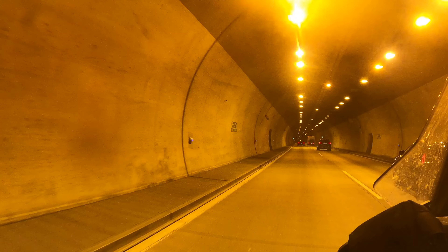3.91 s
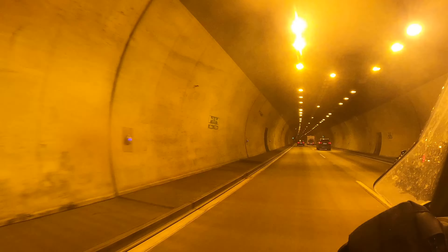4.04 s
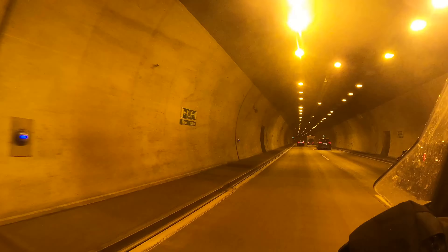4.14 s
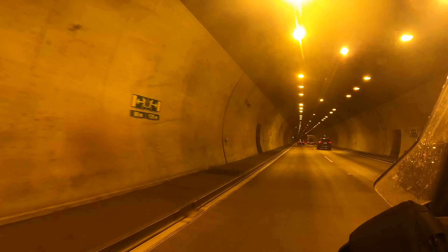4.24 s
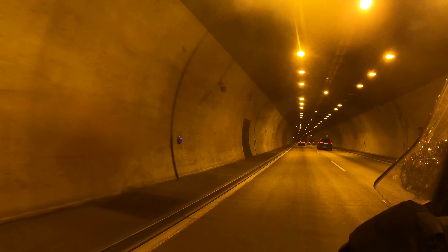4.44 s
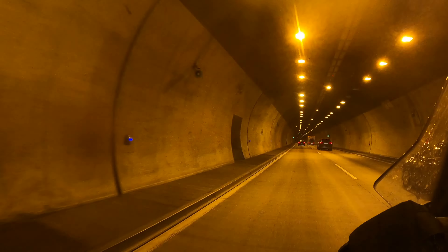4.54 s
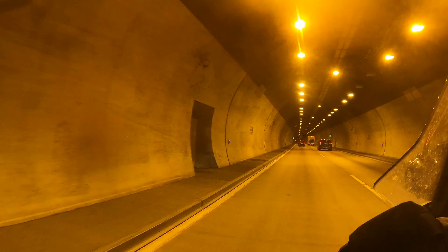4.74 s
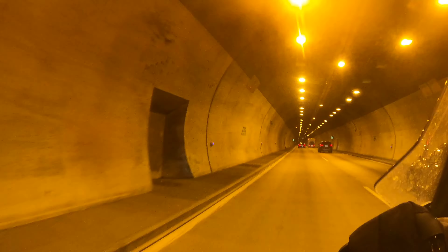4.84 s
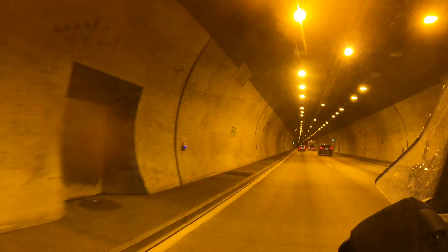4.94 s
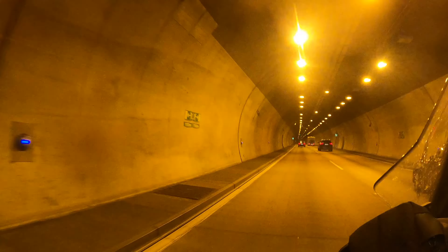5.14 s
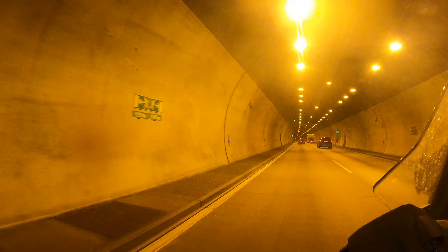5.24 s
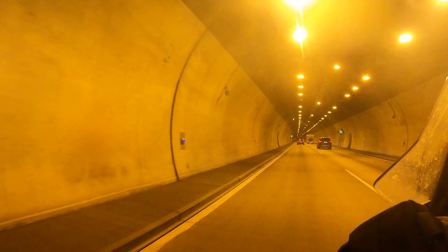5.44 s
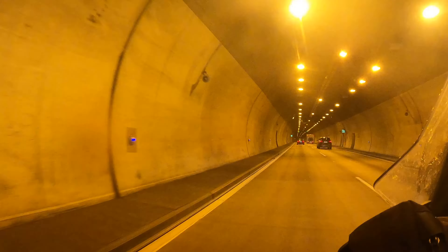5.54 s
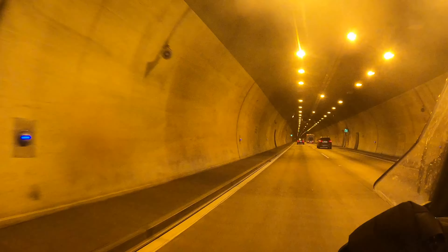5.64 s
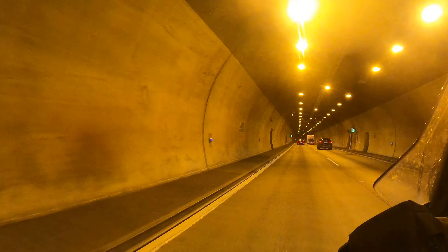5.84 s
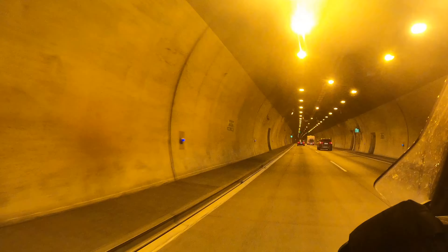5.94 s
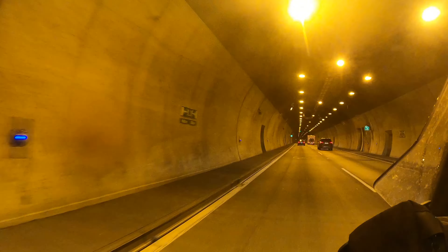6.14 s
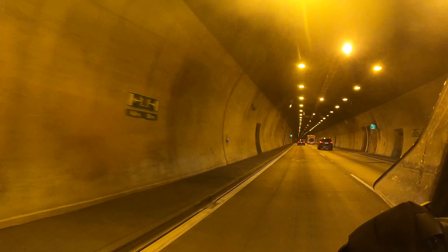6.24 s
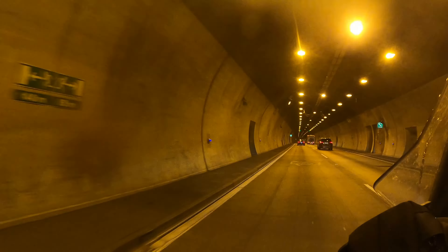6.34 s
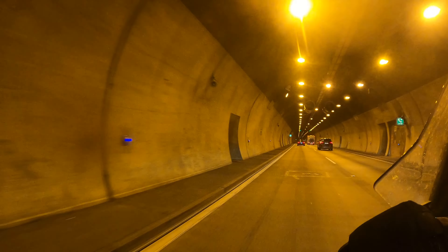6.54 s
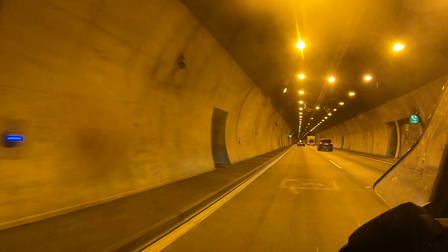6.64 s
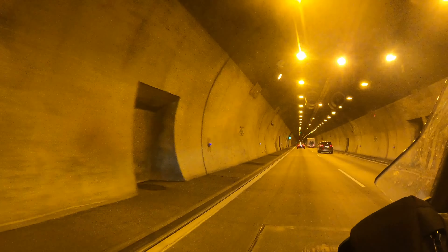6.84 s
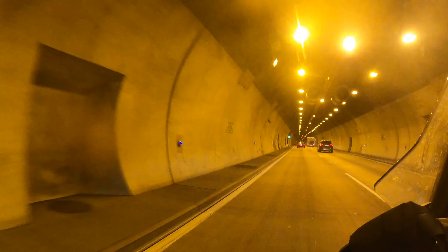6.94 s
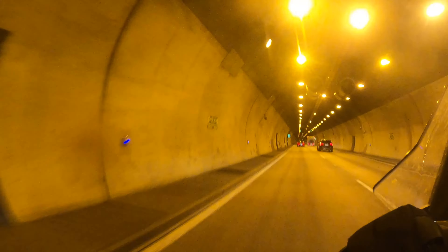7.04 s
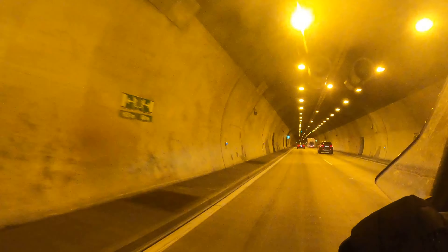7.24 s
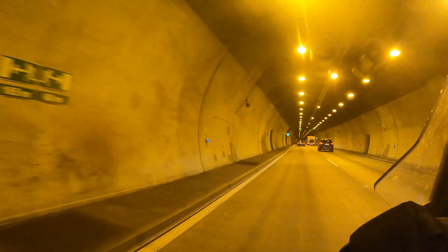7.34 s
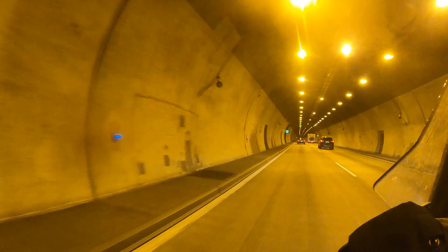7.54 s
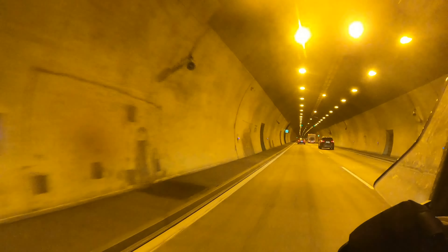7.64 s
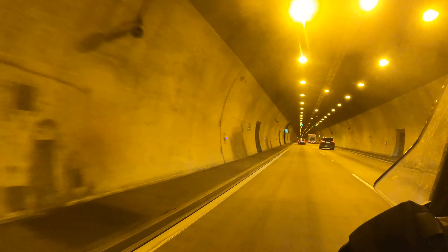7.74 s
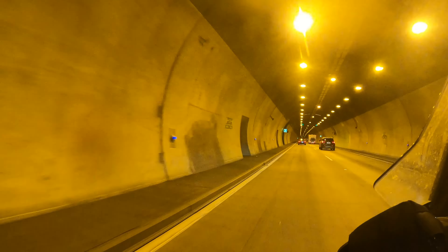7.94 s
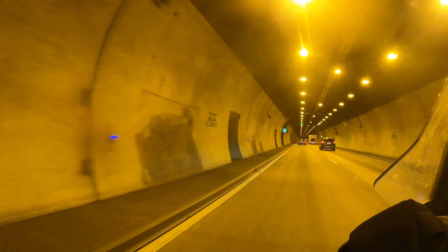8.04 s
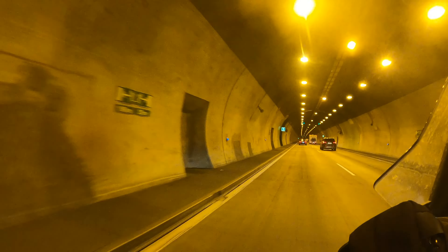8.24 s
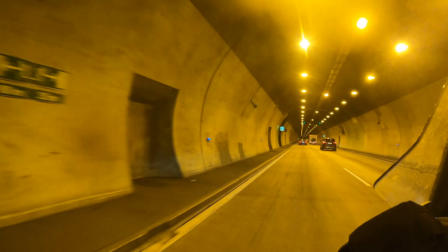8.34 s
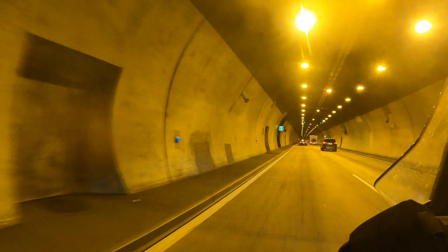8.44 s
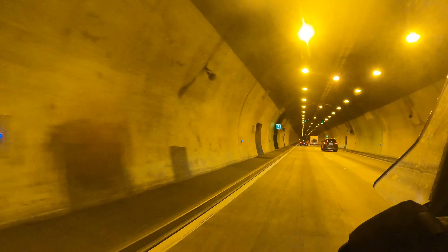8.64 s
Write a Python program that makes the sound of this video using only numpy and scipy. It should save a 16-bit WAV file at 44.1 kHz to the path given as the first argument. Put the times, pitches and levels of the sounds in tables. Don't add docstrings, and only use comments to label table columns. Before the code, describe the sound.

A motorcycle cruises through a concrete tunnel, heard from a housing near the engine. Deep, fluttering exhaust throb holds nearly one pitch while throttle nudges bring rough growls. Wind thumps the microphone throughout, tyre roar builds over the first second and stays dense, air hiss softens, and a second engine blurs in by wall echoes.

```python
import sys
import numpy as np
from scipy import signal
from scipy.fft import rfft, irfft, next_fast_len
from scipy.io import wavfile
from scipy.ndimage import uniform_filter1d, minimum_filter1d

SR = 44100
rng = np.random.default_rng(int(sys.argv[2]) if len(sys.argv) > 2 else 0)


def materialize(psi):
    bounded = np.clip(np.atleast_2d(psi).T, -1, 1)
    quanta = np.round(bounded * 32767).astype(np.int16)
    wavfile.write(sys.argv[1], SR, quanta)


def to_linear_factor(level_db):
    exponent = np.asarray(level_db, float) / 20
    return 10 ** exponent


N = 383669

# (time [s], half length [s], bark level [dB])
THROTTLE_BLIPS = [(0.0, 0.055, -22), (1.3, .12, -25.5), (1.7, .09, -26.5), (2.2, .09, -26),
                  (2.45, .1, -25.5), (2.7, 0.097, -17.5), (3.0, .08, -17), (3.18, .08, -24.5),
                  (5.0, 0.14, -17), (5.3, 0.13, -24), (5.95, .15, -26.5), (6.25, 0.067, -24.5),
                  (6.85, 0.07, -16.5), (7.17, 0.1, -17.5)]
# (time [s], edge level [dB], hiss level [dB])
EDGE_AND_HISS = [(0, -81, -100), (.6, -80, -97.5), (1.2, -71, -92), (2.9, -66, -90.5), (3.3, -66.5, -77.5),
                 (8.7, -67, -77)]


def level(x, db):
    return x * to_linear_factor(db) / np.sqrt(np.mean(x ** 2))


def curves(table):
    s, *columns = np.transpose(table)
    return [np.interp(np.arange(N) / SR, s, c) for c in columns]


def smooth(x, seconds):
    k = int(seconds * SR)
    for _ in range(3):
        x = uniform_filter1d(x, k)
    return x


def walk(rate):
    k = int(SR / rate)
    held = np.repeat(rng.standard_normal(N // k + 1), k)
    return 1.236 * uniform_filter1d(uniform_filter1d(held, k), k)[:N]


def bells(rows):
    t = np.arange(0, N + 100, 100) / SR
    power = sum(to_linear_factor(db) ** 2 * np.exp(-2 * ((t - s) / half) ** 2) for s, half, db in rows)
    return np.interp(np.arange(N) / SR, t, power)


def patchy_noise(shape, shared_db, own_db, own_rate, tilt_db=0):
    size = next_fast_len(N)
    hz = np.maximum(np.arange(size // 2 + 1) * SR / size, 1)
    edges, dbs = np.transpose(shape)
    colour_db = np.interp(np.log(hz), np.log(edges), dbs, -120, -120)
    colour = rfft(rng.standard_normal(size)) * to_linear_factor(colour_db)
    out = 0
    for centre in np.arange(np.log2(edges[0]), np.log2(edges[-1]) + .5, .5):
        share = np.clip(1 - 2 * abs(np.log2(hz) - centre), 0, 1)
        band = irfft(colour * share, size)[:N]
        flicker_db = own_db * walk(own_rate)
        out = out + band * to_linear_factor(flicker_db + tilt_db * (centre - np.log2(1000)))
    return level(out * to_linear_factor(shared_db), 0)


def order(turns, k, wander, scatter, rate):
    echo = scatter * (walk(rate) + 1j * walk(rate))
    wave = (1 + echo) * np.exp(1j * (2 * np.pi * k * turns + wander * walk(1.5)))
    return np.sqrt(2 / (1 + 2 * scatter ** 2)) * wave.real


def buffeting():
    # (frequency [Hz], density [dB per Hz])
    buffet_band = [(15, -4), (30, -1), (80, 2), (150, -0.5), (300, -6), (450, -12), (700, -26), (1100, -46)]
    t = np.arange(N) / SR
    gust_db = 5.5 * np.exp(-(t / .36) ** 4)
    growth_db = 2.5 * np.tanh(t / 1.5)
    buffet_db = -19 + gust_db + growth_db + 0.65 * walk(5.8)
    lull_db = -1.4 * np.exp(-((t - 1.17) / 0.4) ** 2)
    swing_db = 0.37 * walk(9.7) + 3.2 * lull_db
    return to_linear_factor(buffet_db) * patchy_noise(buffet_band, swing_db, own_db=-0.7, own_rate=8.2, tilt_db=lull_db)


def tyre_roar(roar_db, gust_db, opened, flutter):
    # (frequency [Hz], density [dB per Hz])
    roar_band = [(200, -18.5), (400, -5.5), (620, -2.5), (780, -0.5), (900, 0), (1020, -2), (1250, -4.5),
                 (1700, -8), (2400, -17.5), (3500, -25.5), (5000, -43.5)]
    t = np.arange(N) / SR
    bright_start_db = 1.5 * np.exp(-(t / 1.1) ** 2)
    tilt_db = -0.43 + bright_start_db - 1 * opened + gust_db + 0.23 * walk(8)
    roar = patchy_noise(roar_band, .5 * flutter, own_db=0.0, own_rate=11.0, tilt_db=1.8 * tilt_db)
    return to_linear_factor(roar_db + 1.2) * roar


def tread_ring(roar_db):
    # (frequency [Hz], density [dB per Hz])
    tread_band = [(780, -13.5), (860, -2), (930, 0), (1020, -3), (1120, -13)]
    t = np.arange(N) / SR
    growth_db = 3.5 * (1 + np.tanh((t - 5.9) / 0.33)) / 2
    return to_linear_factor(roar_db - 11.5 + growth_db) * patchy_noise(tread_band, 0, own_db=1.0, own_rate=6.)


def air_rush(roar_db, gust_db, opened, flutter):
    # (frequency [Hz], density [dB per Hz])
    rush_band = [(1500, -2.5), (2200, -1.5), (3500, -4.5), (4600, -9.5), (6000, -17.5), (7400, -25),
                 (8000, -34.5), (9000, -34.5), (11500, -49), (14000, -62)]
    t = np.arange(N) / SR
    sinking_db = -9.5 * (1 - np.exp(-t / 2.63))
    rush_db = -8.5 + sinking_db + gust_db + .4 * walk(5)
    rush = patchy_noise(rush_band, 0.49 * flutter, own_db=0.1, own_rate=20.)
    return to_linear_factor(roar_db + rush_db + 1.5 + 0.65 * 0.87 * opened) * rush


def edge_whistle(flutter):
    # (frequency [Hz], density [dB per Hz])
    edge_band = [(7000, -5), (8000, 0), (9000, -2.5), (10000, -7), (11500, -12.5), (12500, -25.5)]
    edge = patchy_noise(edge_band, .6 * flutter, own_db=-1.5, own_rate=20.)
    return to_linear_factor(curves(EDGE_AND_HISS)[0]) * edge


def tunnel_air():
    # (time [s], tyre roar level [dB], gust [dB])
    tube_levels = [(0.0, -30.5, 2.1), (0.06, -30, -1), (0.09, -35.5, -1.5), (0.16, -32, -0.4),
                   (0.24, -34.5, -2.2), (0.4, -31, 0), (0.62, -29, 0.5), (1.0, -24.5, -0.6),
                   (1.35, -24.5, 0.2), (1.7, -25, -0.6), (1.95, -23.5, 0.7), (2.55, -23.5, 0.2),
                   (3.3, -25, 0.4), (4.1, -25, 0.2), (4.7, -24, 0.24), (6.65, -22.8, 0.14),
                   (7.6, -25, 0.14), (8.7, -22.5, -0.35)]
    opened = smooth(np.minimum(np.sqrt(bells(THROTTLE_BLIPS)) / to_linear_factor(-18), 1), .05)
    roar_db, gust_db = curves(tube_levels)
    roar_db = roar_db - 0.87 * opened
    flutter = walk(28)
    near_roar = tyre_roar(roar_db, gust_db, opened, flutter)
    rush = air_rush(roar_db, gust_db, opened, flutter)
    return near_roar + rush + tread_ring(roar_db) + edge_whistle(flutter)


def tyre_whine():
    # (time [s], frequency [Hz], length [s], level [dB])
    ribbed_patches = [
        (2.44, 664, .045, -23),
    ]
    t = np.arange(N) / SR
    out = 0
    for s, hz, length, db in ribbed_patches:
        since = t - s
        tone = np.cos(2 * np.pi * hz * since * (1 - .25 * since))
        out = out + to_linear_factor(db) * np.exp(-(since / length) ** 2) * tone
    return out


def other_bike():
    # (time [s], firing rate [Hz], level [dB])
    passes = [(3.3, 59.9, -55), (3.4, 60.25, -26), (3.7, 61.44, -20), (4.1, 62.57, -21), (4.4, 63.2, -30),
              (4.7, 62.4, -28), (4.9, 61.55, -25), (5.0, 60.97, -51), (7.9, 61.26, -57.5), (8.0, 61.3, -24),
              (8.3, 62.04, -24.5), (8.5, 61.0, -27), (8.7, 62, -25)]
    # (order, level [dB])
    exhaust_orders = [(1, 1), (2, -3), (3, -3), (4, -1.5), (5, -7), (6, -17), (7, -12)]
    hz, db = curves(passes)
    db = np.where(np.arange(N) < passes[0][0] * SR, -80, db)
    turns = np.cumsum(hz) / SR
    stack = sum(to_linear_factor(g) * order(turns, round(k), 2.98, scatter=0.16, rate=16.0) for k, g in exhaust_orders)
    return to_linear_factor(db) * stack


def own_bike():
    # (time [s], firing rate [Hz], load [dB])
    ride = [(0.0, 58.74, 1), (0.8, 58.5, -3.5), (1.5, 58.14, 0), (2.4, 57.35, -3), (2.6, 57.73, 3.5),
            (3.05, 59.85, 9), (3.3, 59.2, 3), (3.6, 58.55, -1.5), (4.3, 58.68, 2.5), (4.8, 58.9, 1),
            (4.94, 60.42, 2), (5.3, 59.74, 1.5), (6.0, 59.36, -0.5), (6.72, 59.53, 0.5), (7.15, 60.9, 4),
            (7.27, 60.8, 6.5), (7.46, 59.09, -0.5), (8.7, 58.74, 0)]
    cruise_levels = [-24.5, -28, -31.5, -30.5]
    # (order, level at cruise [dB], level with the throttle open [dB])
    bark_orders = [(5, -6.5, -4), (6, -3.5, -4), (7, -7.5, -11.5), (8, -8, -14.5), (9, -8, -16.5),
                   (10, -14, -22.5)]
    # (time [s], order, half length [s], level [dB])
    wall_swells = [(0.295, 1, 0.062, -21), (0.93, 2, 0.083, -22.5), (1.45, 4, .07, -26),
                   (1.5, 1, 0.16, -18), (1.76, 3, 0.078, -21.5), (1.86, 1, 0.074, -22),
                   (1.97, 2, 0.047, -22), (2.07, 3, 0.062, -17.5), (2.33, 3, 0.084, -19),
                   (2.47, 1, 0.084, -18.5), (2.64, 3, 0.084, -19.5), (2.77, 2, 0.13, -18),
                   (2.85, 4, 0.063, -17.5), (2.9, 1, .18, -19), (2.9, 3, 0.062, -21),
                   (3.11, 4, 0.11, -14.5), (3.21, 2, 0.031, -17), (3.28, 3, 0.074, -21.5),
                   (3.4, 1, .11, -14), (3.52, 3, 0.046, -16), (3.5, 4, 0.21, -22), (3.82, 1, .1, -14),
                   (4.14, 1, 0.081, -17.5), (4.35, 1, .07, -18.5), (4.35, 4, 0.068, -22),
                   (4.45, 2, 0.068, -21), (4.66, 1, .13, -17.5), (4.66, 4, 0.076, -20), (4.76, 2, .07, -18),
                   (5.03, 1, .13, -11)]
    # (time [s], order, half length [s], level [dB])
    later_swells = [(5.12, 3, .08, -17.5), (5.2, 4, 0.15, -22), (5.39, 3, 0.077, -15.5),
                    (5.53, 2, .15, -15.5), (5.62, 4, .11, -20.5), (5.75, 3, 0.1, -15), (5.8, 2, 0.064, -19),
                    (5.72, 1, 0.13, -18), (6.08, 1, .14, -16), (6.12, 3, 0.16, -20), (6.3, 4, 0.11, -22),
                    (6.48, 2, 0.35, -19.5), (6.5, 3, 0.13, -20), (6.84, 1, .08, -11), (6.84, 4, 0.073, -18),
                    (6.94, 3, 0.078, -17), (7.15, 3, 0.059, -13.5), (7.17, 4, 0.078, -22),
                    (7.35, 3, 0.071, -15), (7.36, 4, 0.057, -19.5), (7.38, 1, .22, -15),
                    (7.56, 2, 0.054, -19), (7.64, 4, .1, -20), (7.76, 3, .16, -18), (7.87, 1, 0.095, -16),
                    (7.97, 2, .07, -15.5), (8.07, 3, 0.073, -17.5), (8.18, 1, 0.063, -22),
                    (8.39, 1, .07, -17.5), (8.55, 3, 0.076, -14.5)]
    # (frequency [Hz], density [dB per Hz])
    gas_band = [(230, -13), (300, 1.5), (400, -7), (520, -8)]
    hz, load_db = curves(ride)

    def fading(db):
        return to_linear_factor(db + load_db + 2.5 * walk(9.)) ** 2

    bark_db = 10 * np.log10(fading(-31) + bells(THROTTLE_BLIPS))
    throttle = smooth(np.clip((bark_db + 28) / 7, 0, .8), .08)
    turns = np.cumsum(hz * (1 + .003 * walk(40))) / SR

    low = 0
    for k, db in enumerate(cruise_levels, 1):
        swells = [(s, half, g) for s, n, half, g in [*wall_swells, *later_swells] if round(n) == k]
        gain = np.sqrt(fading(db) + bells(swells))
        late = turns - .12 / k ** 2
        low = low + gain * order(late, k, 2.4 * (1 - throttle), scatter=.17, rate=14.)

    bark = 0
    for k, cruise, wide in bark_orders:
        gain = to_linear_factor(cruise + throttle * (wide - cruise))
        bark = bark + gain * order(turns - .015, round(k), 1.82 * (1 - throttle), scatter=.22, rate=16.)

    surge = 1 + .6 * np.cos(2 * np.pi * (turns - .15))
    gas = throttle * surge * patchy_noise(gas_band, 0, own_db=1., own_rate=15.)
    return low + to_linear_factor(bark_db) * (bark + to_linear_factor(-5) * gas)


def scene():
    return (buffeting() + tunnel_air() + tyre_whine() + other_bike() + own_bike())[None]


def low_pass(x):
    return signal.sosfilt(signal.butter(12, 15140, fs=SR, output="sos"), x)


def record(dry):
    # (frequency [Hz], density [dB per Hz])
    hiss_band = [(10800, -14), (11600, -4), (12300, 0), (13500, -3.5), (15300, -9)]
    pumped = dry * (to_linear_factor(-13) ** 2 / (smooth(dry ** 2, .025) + 1e-6)) ** .07
    room_left = np.minimum(1, .78 / (abs(pumped) + 1e-6))
    held = pumped * smooth(minimum_filter1d(room_left, int(.012 * SR)), .004)
    held = held * np.minimum(1, np.arange(N) / (.004 * SR)) ** 2
    hiss = to_linear_factor(curves(EDGE_AND_HISS)[1]) * patchy_noise(hiss_band, 0, own_db=0.0, own_rate=8.)
    return low_pass(held + hiss)


dry = scene()
out = record(dry)
materialize(out)
```